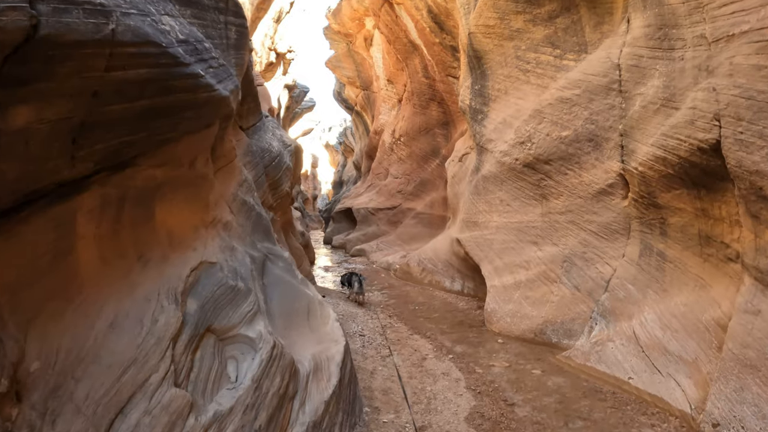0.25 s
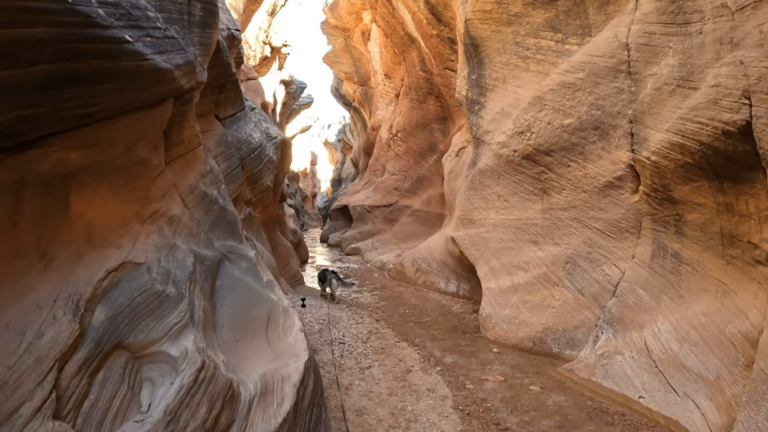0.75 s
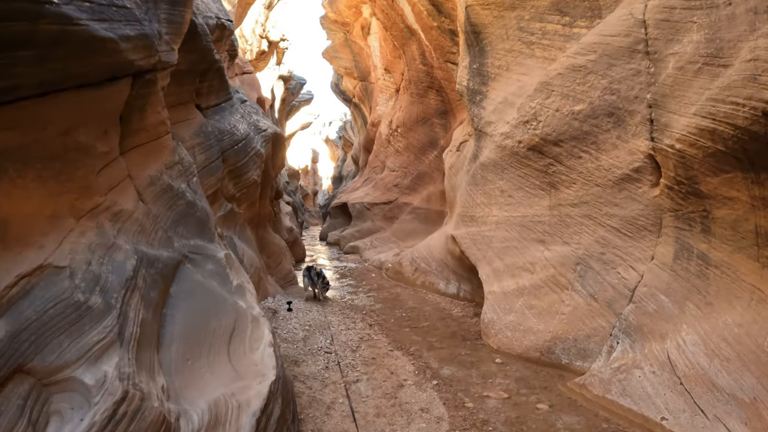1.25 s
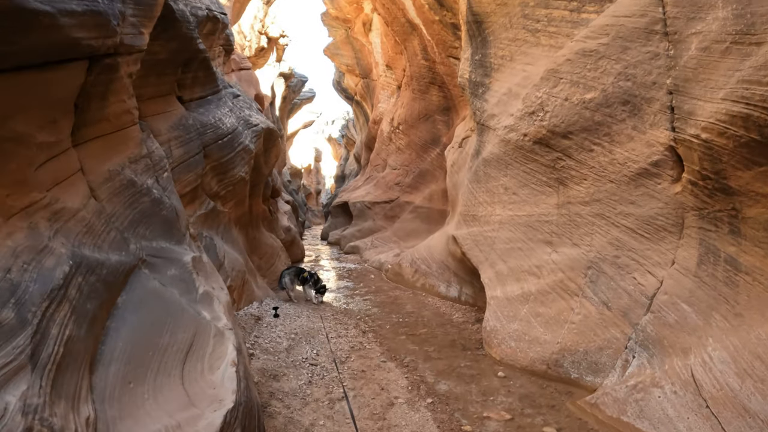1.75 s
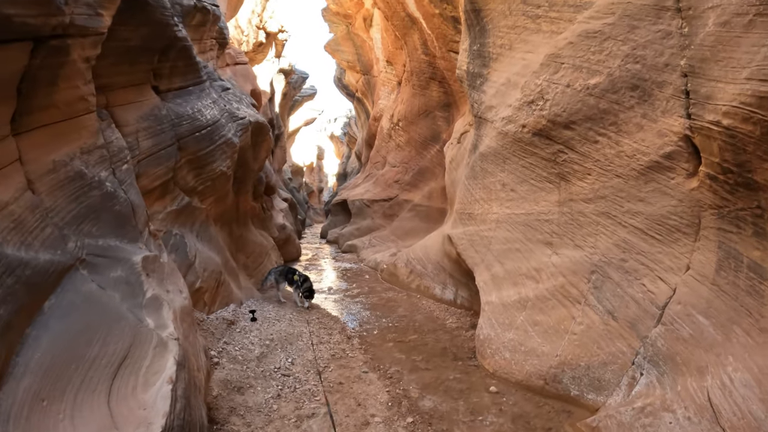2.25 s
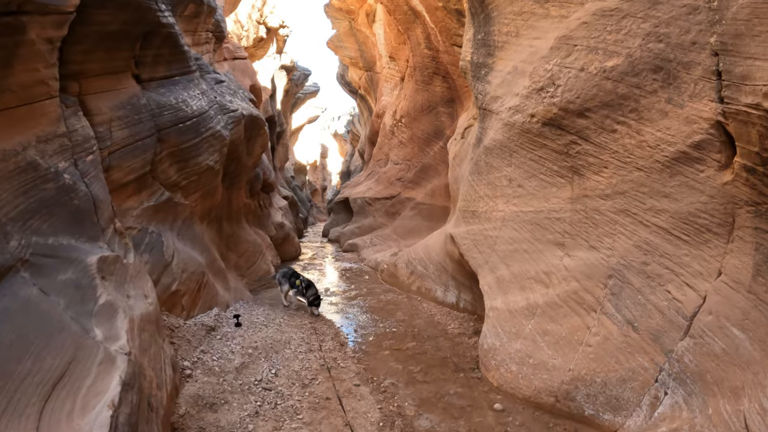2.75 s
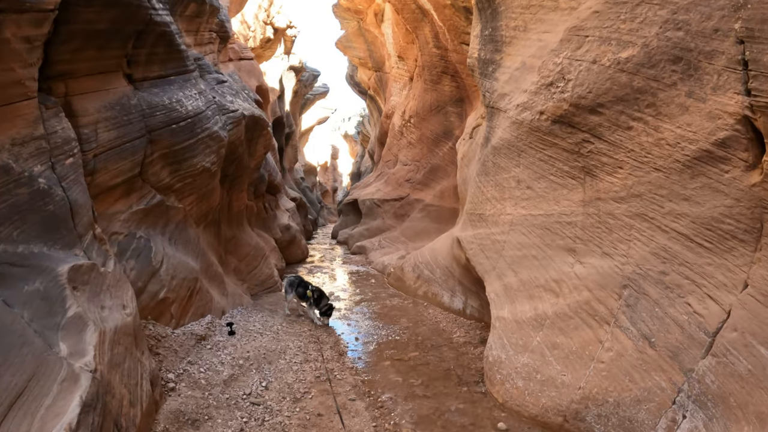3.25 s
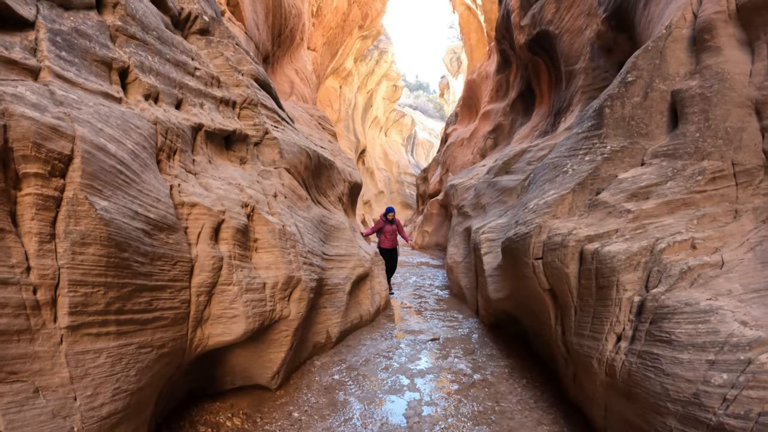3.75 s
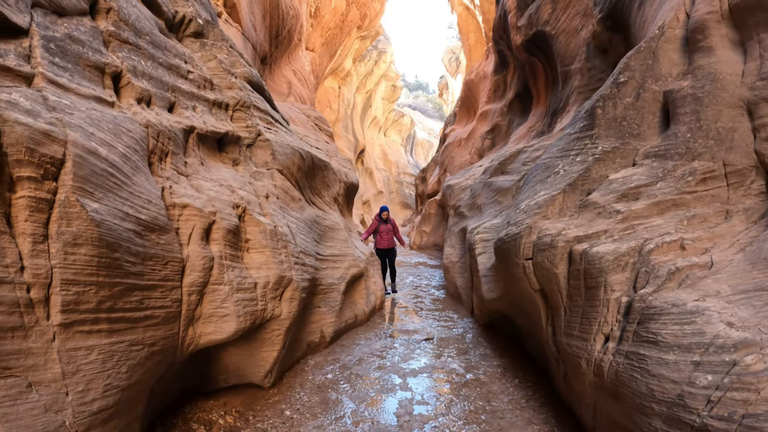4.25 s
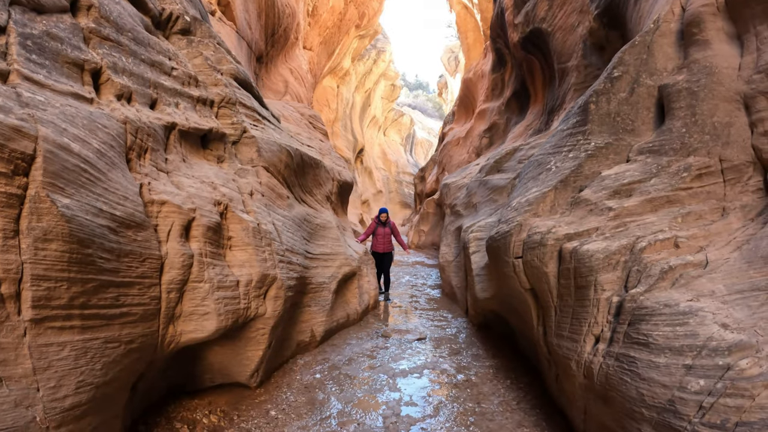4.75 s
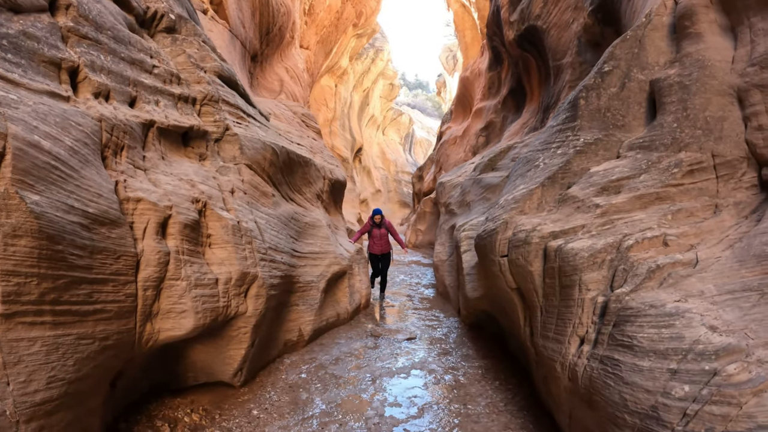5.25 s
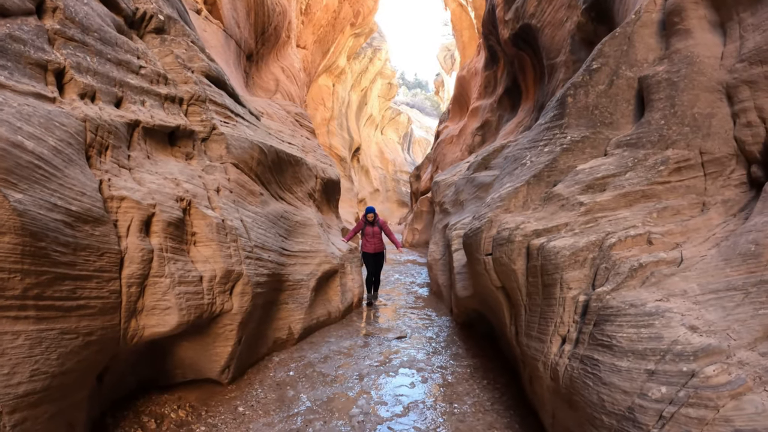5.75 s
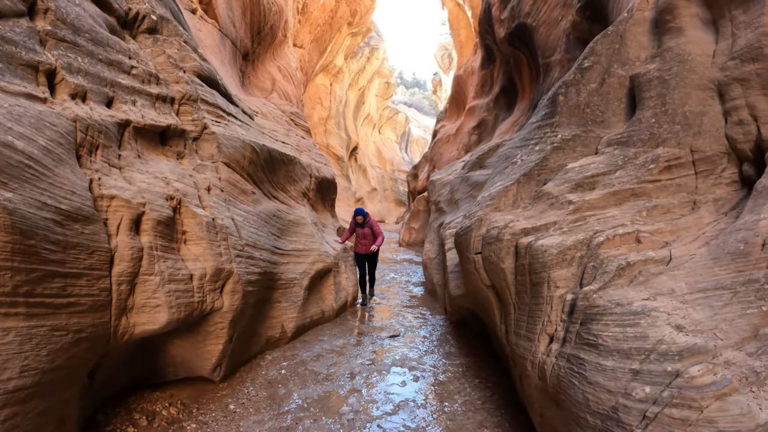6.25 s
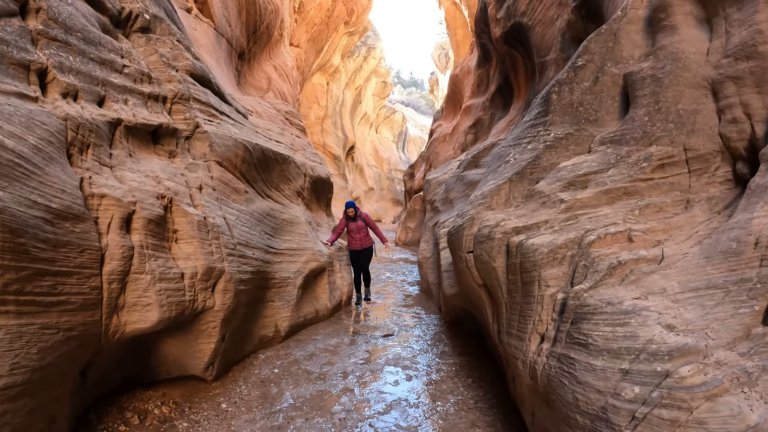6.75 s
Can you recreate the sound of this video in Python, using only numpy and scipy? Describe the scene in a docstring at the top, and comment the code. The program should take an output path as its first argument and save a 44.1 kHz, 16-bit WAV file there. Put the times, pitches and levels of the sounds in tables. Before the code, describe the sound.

Close, slightly left, someone walks on wet sand and gravel: six dull, gritty crunches with squelches, knocking pebbles and small drips, over a faint low rumble and soft creek babble. Midway the sound cuts to a person wading straight ahead; steps slap, spray, gulp and trickle in shallow water. Stone walls return a short echo, and air lightly buffets the stereo microphone.

```python
"""Footsteps in a slot canyon. First someone walks on wet sand and pebbles close by, over a low far rumble of filtered noise;
sand is random damped grains, pebbles are short modes. Then, after a cut, a walker wades through the shallow creek:
each step slaps, churns up ringing bubbles and throws spray, among gliding gulps, trickles and low surges of noise.
The creek babbles throughout, air brushes the microphone, and the sandstone walls give a short echo by convolution."""
import sys
import numpy as np
from scipy import signal
from scipy.fft import rfft, irfft, next_fast_len
from scipy.io import wavfile

SR = 44100
rng = np.random.default_rng(int(sys.argv[2]) if len(sys.argv) > 2 else 0)


def to_wav(sig):
    """Store sig (one row per channel, or 1-D mono) as 16-bit WAV at the path in sys.argv[1].

    Samples outside -1..1 are clipped; the rate is SR.
    """
    pcm = np.clip(np.atleast_2d(sig), -1, 1) * 32767
    pcm = np.round(pcm).astype(np.int16)
    wavfile.write(sys.argv[1], SR, pcm.T)  # frames by channels


N = 308259
TIME = np.arange(N) / SR
CUT_S = 3.755  # the walk on sand ends and the wading begins
LEFT_RIGHT = np.array([[1], [-1]])  # signs that turn a side signal into left and right


def gain_of(db):
    """Logarithmic level: 20 dB is a factor of ten in amplitude."""
    return 10 ** (np.asarray(db) / 20)


def evened(x):
    """Normalisation by effective value: scales to rms 1."""
    return x / np.sqrt(np.mean(x ** 2) + 1e-20)


def read(points, hz):
    """Interpolation on a logarithmic frequency axis, level beyond the end points."""
    point_hz, value = np.transpose(points)
    return np.interp(np.log(hz + 1), np.log(point_hz + 1), value)


def curve(rows):
    """Linear interpolation in time of rows of (seconds, value)."""
    return np.interp(TIME, *np.transpose(rows))


def colour(x, points, share=1):
    """Linear filtering: multiplies the spectrum by a share of a dB curve."""
    size = next_fast_len(N + 4096)
    hz = np.fft.rfftfreq(size, 1 / SR)
    return irfft(rfft(x, size) * gain_of(share * read(points, hz)), size)[..., :N]


def lowpassed(x, edge_hz, rate=SR):
    """Second-order low-pass filtering."""
    return signal.sosfilt(signal.butter(2, edge_hz, fs=rate, output="sos"), x)


def add(mix, s, sound):
    """Superposition: mixes a sound in from time s, or from 0 if s is negative."""
    part = mix[..., max(round(s * SR), 0):][..., :sound.shape[-1]]
    part += sound[..., :part.shape[-1]]


def together(levels):
    """Incoherent addition: the powers of unrelated sounds add."""
    return np.sqrt(sum(np.square(one) for one in levels))


def envelope(age, rise_s, hold_s, fall_s):
    """Attack and release: a linear rise from age 0, a hold until hold_s, an exponential decay."""
    return np.clip(age / rise_s, 0, 1) * np.exp(-np.clip((age - hold_s) / fall_s, 0, 20))


def swell(t, rise_s, fall_s):
    """Asymmetric pulse: a smooth rise to a peak at t = 0 and an exponential decay."""
    return np.exp(-np.minimum(np.where(t < 0, (t / rise_s) ** 2, t / fall_s), 20))


def noise(points, width):
    """Mid-side stereo from independent coloured noises; width is the ratio of side to mid."""
    mid, side = colour(rng.standard_normal((2, N)), points)
    return evened(mid) + width * evened(side) * LEFT_RIGHT


def resonance(hz, width_hz):
    """Narrow-band noise: slow random amplitude and phase modulate a carrier that follows the curve hz."""
    turn = np.exp(2j * np.pi * np.cumsum(hz) / SR)
    slow = lowpassed(rng.standard_normal((2, len(hz))), width_hz)
    return evened((turn * (slow[0] + 1j * slow[1])).real)


def ring(db, hz, fall, octaves, onset):
    """Damped oscillation: a softly started tone decays with time constant fall, gliding towards octaves."""
    t = np.arange(int(7 * fall * SR)) / SR
    glide = 2 ** (octaves * (1 - np.exp(-t / fall / 2)))
    turns = np.cumsum(hz * glide) / SR
    return gain_of(db) * (1 - np.exp(-t * hz / onset)) * np.exp(-t / fall) * np.sin(2 * np.pi * turns)


def grains(per_s, low_hz, high_hz, cycles, spread_db, glide, width, size, count=N):
    """Granular synthesis: damped rings at random times, pitches, strengths and places; glide raises their pitch.

    The result lasts count samples and each ring lasts size samples.
    """
    when, pitch, strength, place, length = rng.random((int(per_s * count / SR) + 1, 5)).T
    hz = low_hz * (high_hz / low_hz) ** pitch
    turns = hz[:, None] * np.arange(size) / SR
    age = turns / (cycles * (.5 + length[:, None]))  # in decay times
    strength_db = -spread_db * np.log(1 - .96 * strength)  # many weak, few strong
    height = gain_of(strength_db) * np.sqrt(hz)
    rings = height[:, None] * np.exp(-age) * np.sin(2 * np.pi * turns * (1 + glide * age))
    at = ((when * count).astype(int)[:, None] + np.arange(size)).ravel()
    pan = width * (2 * place[:, None] - 1)
    return np.array([np.bincount(at, (rings * (1 + side * pan)).ravel(), count)[:count] for side in (1, -1)])


def clumps(per_s=14, patchy_db=1.5):
    """Random amplitude modulation: a gain that wanders about 1, with drift up to about per_s Hz."""
    drift = lowpassed(rng.standard_normal(N // 100 + 1), per_s, rate=SR / 100)
    coarse_time = TIME[::100]
    return gain_of(patchy_db * np.interp(TIME, coarse_time, evened(drift)[:len(coarse_time)]))


# The far rumble's level. Each row: time in seconds, level in dB before the overall trim.
RUMBLE_LEVEL = [(0.0, -42.5), (0.66, -52.5), (0.7, -42), (0.74, -46), (2.73, -43.5), (2.78, -40),
                (3.28, -47.5), (3.3, -53), (3.38, -44.5), (3.7, -43.5)]
# Spectrum of the rumble. Each row: frequency in Hz, level in dB.
RUMBLE_TONE = [(30, -14), (60, 0.5), (85, -3), (110, 2), (135, 0), (170, 0), (220, -0.5), (290, -11),
               (380, -11.5), (480, -31), (800, -95)]
# The rumble's boom, which mostly sinks along the passage. Each row: time in seconds, pitch in Hz.
BOOM_PITCH = [(0, 165), (.7, 172), (1.2, 158), (1.9, 140), (2.3, 116), (3.0, 106), (3.74, 109.8)]


def rumble(trim_db=-0.7, boom_db=-4):
    """Resonance: far low noise, with one broad resonance of the passage standing out of it."""
    boom = resonance(curve(BOOM_PITCH), width_hz=13.2)
    bed = noise(RUMBLE_TONE, width=.07)
    return gain_of(trim_db) * gain_of(curve(RUMBLE_LEVEL)) * evened(bed + gain_of(boom_db) * boom)


# Spectrum of the creek's wash. Each row: frequency in Hz, level in dB per Hz.
CREEK_TONE = [(120, -8.5), (200, -1.5), (450, -1.5), (850, -12), (1050, -5.5), (1450, 3), (3100, -1),
              (7000, -7.5), (12000, -30.5), (15000, -34)]


def creek(wash_db=-64.5, babble_db=-69):
    """Bubble resonance in number: a soft wash and a dense babble of small bubbles swell and ebb together."""
    babble = grains(500, 950, 2800, cycles=7, spread_db=1.3, glide=.015, width=.7, size=1024)
    wash = gain_of(wash_db) * noise(CREEK_TONE, width=0.94)
    return clumps(per_s=10.5, patchy_db=1.0) * (wash + gain_of(babble_db) * evened(babble))


# Spectrum of air on the microphone. Each row: frequency in Hz, level in dB.
AIR_TONE = [(4, -5), (9, -1), (20, -9), (32, -16), (50, -27), (90, -50), (300, -80)]
# level while walking on sand, level while wading, and the waft that follows each step on the sand
AIR_WALKING_DB, AIR_STANDING_DB, WAFT_DB, WAFT_LAG_S = -46.5, -56.5, -38.5, 0.055


def air(standing):
    """Flow noise: air brushes the microphone, most when a step swings it forward."""
    wafts = together(envelope(TIME - s - WAFT_LAG_S, rise_s=0.032, hold_s=0.089, fall_s=0.16) for s, *_ in SAND_STEPS)
    walking_flow = gain_of(AIR_WALKING_DB) + gain_of(WAFT_DB) * wafts
    flow = (1 - standing) * walking_flow + standing * gain_of(AIR_STANDING_DB)
    return flow * noise(AIR_TONE, width=.25) * gain_of([[-2], [1.5]])  # left and right dB


# Swells of water pushed aside by the legs. Each row: time of the peak in seconds, level in dB, length in seconds.
SURGES = [(4.693, -56.5, 0.063), (4.97, -52.5, 0.22), (5.21, -52, 0.16), (5.658, -56, 0.1),
          (5.98, -53.5, 0.068), (6.432, -61.5, 0.047)]
# Spectrum of the surges. Each row: frequency in Hz, level in dB.
SURGE_TONE = [(40, 11.5), (90, -37), (125, -1.5), (165, 12.5), (230, 1.5), (350, -12.5), (700, -84)]
SURGE_REST_DB, SURGE_RISE = -71.5, 0.71  # the current between swells; a swell's rise as a share of its length


def surges():
    """Displacement flow: the low wash of water shoved along by each leg, as swelling noise."""
    push = together(gain_of(db) * swell(TIME - s, SURGE_RISE * length, length) for s, db, length in SURGES)
    return np.hypot(push, gain_of(SURGE_REST_DB)) * noise(SURGE_TONE, width=0.21)


# Water running off a lifted boot. Each row: start in seconds, level in dB, length in seconds, middle pitch in Hz.
TRICKLES = [(4.022, -63, 0.2, 2160), (5.302, -58.5, 0.54, 1507), (5.314, -65, 0.057, 4630),
            (6.085, -53.5, 0.082, 1050), (6.679, -67, 0.16, 1120)]


def trickles(spread=1.197, rise_s=0.011, fall_s=0.057):
    """Bubble entrainment: a thread of water falls into the creek and rings a run of like-sized bubbles."""
    out, t = np.zeros((2, N)), np.arange(SR) / SR
    for s, db, length, hz in TRICKLES:
        run = grains(260, hz / spread, hz * spread, cycles=6.6, spread_db=2.3, glide=0.011, width=0.87, size=1024, count=SR)
        add(out, s, gain_of(db) * envelope(t, rise_s, length, fall_s) * evened(run))
    return out


# Spectrum of fine spray, shared with the sand's fizz. Each row: frequency in Hz, level in dB per Hz.
SPRAY_TONE = [(1500, 5.5), (3000, 3), (4200, 5), (6000, 1.5), (8000, -5), (15000, -28.5)]


def drips(drip_db=-63):
    """Impulsive excitation: separate drops tick into the wet ground after each step on the sand."""
    drops = colour(grains(90, 1400, 6460, cycles=7.1, spread_db=5.0, glide=0, width=1.0, size=256), SPRAY_TONE)
    after_step = together(envelope(TIME - s, rise_s=0.019, hold_s=0.1, fall_s=0.4) for s, *_ in SAND_STEPS)
    return gain_of(drip_db) * after_step * evened(drops)


# Air cavities sucked open round a leg. Each row: start in seconds, end in seconds, level in dB,
# pitch at start in Hz, pitch at end in Hz, froth as a share of power from 0 to 1.
GULPS = [(5.14, 5.225, -49.5, 199, 140, 0.7), (5.155, 5.32, -57, 480.5, 279, 0.9),
         (5.205, 5.30, -50, 115, 65.6, 0.7), (5.567, 5.718, -58, 329, 228.6, 0.84),
         (6.005, 6.052, -51, 389, 522, 0.5), (6.048, 6.079, -48, 660, 1193, 0.3),
         (6.525, 6.597, -54, 431, 780, 0.4), (6.605, 6.662, -46.5, 521, 910, 0.27)]


def gulps(froth_width=.36, taper=0.6):
    """Cavity resonance: part tone and part froth, its pitch climbs as it fills and falls as it opens."""
    out = np.zeros(N)
    for start, end, db, first_hz, last_hz, froth in GULPS:
        hz = np.geomspace(first_hz, last_hz, round((end - start) * SR))
        tone = evened(np.sin(2 * np.pi * np.cumsum(hz) / SR))
        foam = resonance(hz, froth_width * froth * hz.mean())
        gurgle = np.sqrt(1 - froth) * tone + np.sqrt(froth) * foam
        add(out, start, gain_of(db) * evened(gurgle) * signal.windows.tukey(len(hz), taper))
    return out


# Single plops. Each row: start in seconds, level in dB before the soft onset, starting pitch in Hz,
# decay time constant in seconds, pitch change approached in octaves.
PLOPS = [(1.89, -29.5, 1450, 0.0024, -0.33), (1.946, -23, 1665, 0.0031, -0.83),
         (1.9496, -20, 1384, 0.0031, -0.22), (2.053, -38, 1340, 0.005, -0.02),
         (2.777, -28, 540, 0.0033, -.3), (2.812, -30, 360, 0.004, .1), (2.823, -25.5, 640, 0.0028, .15),
         (2.83, -33, 1180, 0.0027, 0), (2.844, -26.5, 570, .007, -0.052),
         (2.901, -29, 1680, 0.0038, -0.073), (3.173, -41, 2330, 0.0019, 0.079),
         (3.175, -37.5, 3020, 0.0038, 0.099), (3.687, -32, 1290, 0.0039, 0.063),
         (4.05, -46, 2310, 0.0065, 0.16), (4.135, -53, 2080, .005, 0.07), (4.257, -47, 2400, 0.0054, 0.14),
         (4.405, -54, 3100, .005, .05), (4.933, -31, 2600, 0.0038, 0.49),
         (4.966, -41, 1640, 0.0043, -0.034), (4.995, -37, 1075, 0.006, -0.16),
         (5.139, -34, 572, 0.0086, -0.61), (5.301, -42.5, 1575, 0.0058, -0.074),
         (5.328, -34, 1534, 0.0052, -0.15), (5.393, -43, 1520, 0.0065, .1),
         (5.622, -41, 476, 0.0042, 0.046), (5.651, -38, 1660, 0.0048, 0.035),
         (5.748, -47, 1120, 0.0054, -0.018), (5.919, -42.5, 1060, 0.0047, .1),
         (6.038, -39, 600, 0.0059, 0.031), (6.067, -32, 1030, 0.011, 0.017),
         (6.516, -47, 747, 0.0078, 0.031), (6.544, -47, 1010, .005, 0.022), (6.572, -43, 1440, .005, .05),
         (6.577, -34.5, 600, 0.0062, 0.41), (6.596, -39, 650, 0.0068, 0.38), (6.612, -36, 454, 0.014, 0.33),
         (6.653, -35, 1070, 0.005, 0.22), (6.668, -33, 1040, 0.012, 0.07),
         (6.671, -32.5, 1465, .005, 0.048), (6.722, -40, 1230, 0.0056, .1),
         (6.728, -41.5, 308, 0.011, 0.06), (6.791, -39, 2160, 0.0056, 0.091),
         (6.794, -43, 1000, .007, 0.061), (6.811, -40, 1083, .006, .1), (6.812, -43, 1650, .004, .1),
         (6.843, -36, 1157, 0.0077, 0.12)]


def plops():
    """Bubble resonance: single air pockets close and ring, gliding in pitch as they die."""
    out = np.zeros(N)
    for s, db, hz, fall, octaves in PLOPS:
        add(out, s, ring(db, hz, fall, octaves, onset=0.93))
    return out


# Heavy footfalls. Each row: start in seconds, level in dB before the soft onset, pitch in Hz, decay time constant in seconds.
THUDS = [(0.697, -23.5, 69, 0.0082), (2.15, -33, 215, 0.017), (2.813, -29, 227, 0.014),
         (5.145, -39, 100, 0.013)]


def thuds():
    """Damped oscillation: heavy footfalls thump the bed at a steady low pitch."""
    out = np.zeros(N)
    for s, db, hz, fall in THUDS:
        add(out, s, ring(db, hz, fall, octaves=0, onset=0.2))
    return out


# Pebbles and coarse grit knocking together. Each row: start in seconds, peak level in dB before dulling, pitch in Hz.
PEBBLES = [(0.1121, -24, 3370), (0.1143, -26.5, 4600), (0.1486, -26, 1700), (.174, -41, 2620),
           (0.2223, -16, 2090), (.2238, -17, 1520), (.236, -20.5, 1410), (0.255, -26, 1450),
           (.2603, -47, 4860), (0.5, -39, 1500), (.504, -30.5, 1350), (2.112, -23, 3700),
           (2.1218, -25, 4540), (2.156, -13, 4300), (2.1575, -18.5, 1700), (2.247, -31, 2400),
           (2.3225, -29.5, 1300), (2.332, -40, 1470), (2.7985, -27, 2100), (2.8134, -24, 1150),
           (2.866, -23, 1700), (2.8699, -15, 6850), (2.8733, -17, 5070), (2.889, -21, 3930),
           (2.901, -27.5, 1690), (2.921, -25.5, 2590), (3.3613, -30, 5000), (3.3694, -28.5, 4480),
           (3.434, -37, 2000), (3.5195, -32.5, 1860), (3.5233, -30.5, 6750), (3.529, -23.5, 5530),
           (3.534, -38, 4500), (3.545, -30.5, 4600), (3.685, -39, 2900), (3.686, -30, 1160),
           (4.7498, -22, 3000), (4.8088, -22, 5000), (4.8155, -19, 3700), (4.9302, -34, 2670),
           (5.117, -30, 2220), (6.629, -31.5, 2470)]


def pebbles(dull_hz=7000, cycles=.9):
    """Modal synthesis: stones knock in a few broad modes, cushioned and damped at once by wet sand."""
    modes = [(.62, 0.042), (1, 0.21), (1.45, -0.1), (2.3, -0.1)]  # ratio to the pitch, amplitude
    out, t = np.zeros(N), np.arange(SR // 60) / SR
    for s, db, hz in PEBBLES:
        knock = sum(share * np.sin(2 * np.pi * hz * ratio * t) * np.exp(-t * hz * ratio / cycles) for ratio, share in modes)
        knock = knock * (1 - np.exp(-t * hz))  # soft contact
        add(out, s, gain_of(db) * knock / abs(knock).max())
    return lowpassed(out, dull_hz)


# Slaps, squelches and scuffs. Each row: time of the peak in seconds, level in dB, rise in seconds, fall in seconds,
# lowest and highest ring pitch in Hz. A burst that would begin before 0 begins at 0, so its peak is later.
SPLATS = [(.015, -58, 0.22, 0.0099, 980, 7650), (0.093, -58, 0.011, 0.039, 1500, 6500),
          (0.112, -34.5, 0.0021, 0.0038, 496, 5000), (.148, -35, 0.0024, 0.0036, 734, 3520),
          (.201, -34, 0.0054, 0.0043, 800, 1700), (0.519, -51, 0.0022, 0.0041, 1800, 6400),
          (0.7, -43.5, 0.002, 0.0051, 246, 1850), (.764, -54.5, 0.02, 0.017, 2920, 8800),
          (1.0, -55.5, 0.036, 0.047, 1520, 6030), (1.137, -51.5, 0.0055, 0.0082, 1500, 7600),
          (1.327, -46.5, 0.018, 0.052, 466, 5130), (1.474, -45, 0.023, 0.016, 1030, 2200),
          (1.716, -56, 0.038, 0.024, 2000, 6960), (1.828, -44, 0.0011, 0.0014, 1500, 6900),
          (1.891, -60, .001, 0.0035, 1500, 7040), (1.944, -46, 0.00086, 0.0033, 1900, 7060),
          (1.948, -36, 0.00067, 0.0069, 380, 2130), (2.042, -50, 0.002, 0.0047, 2020, 7000),
          (2.113, -41.5, 0.018, 0.031, 806, 7300), (2.158, -26, 0.01, 0.014, 710, 7860),
          (2.268, -46, .012, 0.026, 1180, 6600), (2.514, -48.5, 0.012, 0.017, 1200, 7400),
          (2.782, -43, 0.041, 0.066, 357, 4660), (2.801, -36, .004, .012, 710, 2800),
          (2.82, -32, 0.0098, 0.014, 240, 2350), (2.867, -34.5, 0.0035, 0.009, 800, 6500),
          (2.89, -35.5, 0.015, 0.024, 706, 4600), (3.09, -56.5, 0.028, 0.24, 2000, 6700),
          (3.176, -39.5, 0.0017, 0.004, 1980, 3170), (3.364, -44.5, 0.0035, 0.028, 1700, 8100),
          (3.454, -42, .008, 0.023, 825, 2730), (3.495, -45, .008, 0.004, 850, 2700),
          (3.527, -39.5, 0.0057, 0.01, 880, 6600), (3.54, -44.5, .016, 0.013, 705, 2120),
          (3.575, -38, 0.00088, 0.0016, 750, 2250), (3.686, -39.5, 0.0018, 0.0085, 506, 4020),
          (4.164, -52, .015, 0.02, 1630, 9600), (4.295, -58, 0.067, .028, 1800, 8000),
          (4.448, -55.5, 0.0091, 0.026, 1900, 4150), (4.675, -57, 0.034, .025, 1300, 1900),
          (4.682, -54, 0.013, 0.4, 1120, 9200), (4.743, -35.5, 0.0024, 0.0063, 2320, 6460),
          (4.751, -34.5, 0.0017, 0.0096, 1060, 6740), (4.812, -32, 0.0053, 0.023, 1860, 7700),
          (4.93, -37.5, 0.00047, 0.0067, 1200, 3750), (4.978, -47, 0.00066, .0033, 6600, 8440),
          (4.993, -43.5, 0.015, 0.032, 1000, 5460), (5.117, -44, 0.034, 0.018, 890, 2900),
          (5.142, -41, 0.0018, 0.007, 400, 1400), (5.465, -49, 0.0014, 0.04, 740, 3600),
          (5.503, -57, 0.031, 0.023, 3450, 7800), (5.651, -45.5, 0.0007, 0.018, 1310, 2700),
          (5.746, -46, 0.00042, 0.015, 850, 1770), (5.805, -60, 0.0037, 0.014, 3000, 9200),
          (5.928, -41.5, 0.019, 0.014, 2350, 7700), (5.982, -25.5, 0.00047, 0.0019, 3640, 7060),
          (5.987, -34, 0.01, 0.01, 1350, 7300), (5.999, -33.5, 0.006, 0.0078, 1280, 8160),
          (6.065, -40, 0.0025, 0.0054, 3000, 7200), (6.215, -46.5, 0.01, 0.021, 2010, 6240),
          (6.513, -58, 0.0054, 0.065, 704, 4000), (6.576, -45.5, 0.0021, 0.0083, 600, 1700),
          (6.672, -44, 0.0056, 0.0085, 1000, 2210), (6.68, -47.5, 0.032, 0.084, 388, 800),
          (6.83, -50.5, 0.012, 0.031, 1900, 3930)]


def splats(bleed_db=-17):
    """Granular burst: each slap, squelch or scuff, on wet sand or in water, swells and dies as many short uneven rings."""
    out, t = np.zeros((2, N)), np.arange(-SR // 15, SR // 5) / SR
    for s, db, rise, fall, low_hz, high_hz in SPLATS:
        rings = grains(4000, low_hz, high_hz, cycles=1.5, spread_db=2.4, glide=.007, width=.65, size=160, count=len(t))
        band = signal.butter(2, [.85 * low_hz, 1.15 * high_hz], "band", fs=SR)
        rings = signal.lfilter(*band, rings) + gain_of(bleed_db) * rings
        burst = swell(t, rise, fall)
        add(out, s + t[0], gain_of(db) * evened(rings * burst) * np.sqrt(np.mean(burst ** 2)))
    return out


# Steps on wet sand. Each row: start in seconds, time the sole keeps pressing in seconds,
# and levels of crunch, grit and fizz in dB before clumps and lulls.
SAND_STEPS = [(0.076, 0.16, -52.5, -47, -47.5), (0.689, 0.22, -79, -55.5, -59),
              (1.309, 0.54, -57.5, -73, -60.5), (2.085, 0.21, -47.5, -49, -51),
              (2.756, 0.14, -40.5, -40.5, -42), (3.362, 0.19, -49.5, -47.5, -60)]


def tread(lag_s, fall_s, settle_db, settle_s, rest_db, order):
    """Relaxation of one kind of grain: the sole presses and lets go, then the footprint slowly settles."""
    levels = [gain_of(rest_db) * np.ones(N)]
    for s, hold, *dbs in SAND_STEPS:
        for db, fall in [(dbs[order], fall_s), (settle_db, settle_s)]:
            levels.append(gain_of(db) * envelope(TIME - s - lag_s, 0.017, hold, fall))
    return together(levels)


# Spectrum of the sand's crunch. Each row: frequency in Hz, level in dB per Hz.
PRESS_TONE = [(130, -35), (290, -2.5), (380, -2.5), (520, -4.5), (650, -8), (800, -9.5), (1300, 10),
              (3000, -46)]
# Spectrum of the sand's grit, shared with the small bubbles. Each row: frequency in Hz, level in dB per Hz.
BUBBLE_TONE = [(450, -10), (800, -11), (1050, -1), (1500, -0.5), (2100, -4.5), (3000, -7), (5000, -22),
               (9000, -50)]


def sand():
    """Granular friction: soles press wet sand into short dull crunches, grit and a fizz of squeezed water."""
    press = grains(700, 273, 886, cycles=1.0, spread_db=3.5, glide=0, width=0.29, size=512)
    grit = grains(900, 830, 3650, cycles=2.0, spread_db=3.5, glide=0, width=1.0, size=384)
    fizz = grains(2500, 2600, 7900, cycles=0.33, spread_db=2.0, glide=0, width=0.99, size=128)
    press_level = tread(lag_s=0.00071, fall_s=0.02, settle_db=-57.5, settle_s=0.37, rest_db=-78, order=0)
    grit_level = tread(lag_s=0.0024, fall_s=0.048, settle_db=-57, settle_s=0.46, rest_db=-60.0, order=1)
    fizz_level = tread(lag_s=-0.0039, fall_s=0.066, settle_db=-84.0, settle_s=0.44, rest_db=-61.5, order=2)
    return clumps(patchy_db=2.0) * (
        press_level * evened(colour(press, PRESS_TONE))
        + grit_level * evened(colour(grit, BUBBLE_TONE))
        + fizz_level * evened(colour(fizz, SPRAY_TONE)))


def lulls(depth_db=-4, lead_s=0.097, length_s=0.04):
    """Amplitude modulation: the sand falls quiet while the next foot swings forward."""
    dips = sum(np.exp(-((TIME - s + lead_s) / length_s) ** 2) for s, *_ in SAND_STEPS)
    return gain_of(depth_db * dips)


# Strides through the creek. Each row: start in seconds, time to sink in seconds, time in motion in seconds,
# and levels of big pockets, small bubbles and spray in dB before clumps.
STRIDES = [(3.75, 0.01, 0.25, -70, -62, -61.5), (4.0, 0.1, 0.21, -95, -70, -59),
           (4.799, 0.024, 0.21, -55, -46, -52), (5.1, 0.0097, 0.022, -49.5, -55, -83),
           (5.46, 0.2, 0.19, -55, -53, -62), (5.918, 0.019, 0.18, -55.5, -49.5, -61.5),
           (6.549, 0.096, 0.32, -61, -47.5, -50.5)]


def churn(lag_s, linger, fall_s, order):
    """Decay of agitation of one kind of grain: it lasts for a share of each stride, then the water calms."""
    return together(gain_of(dbs[order]) * envelope(TIME - s - lag_s, rise, linger * hold, fall_s)
                    for s, rise, hold, *dbs in STRIDES)


# Spectrum of the big air pockets. Each row: frequency in Hz, level in dB per Hz.
POCKET_TONE = [(130, -13), (290, 1), (500, -2), (700, -1.5), (900, 0.5), (1300, -9), (3000, -39)]


def wading():
    """Bubble resonance by size: legs churn the creek, big air pockets gulp, small bubbles ring, spray patters back."""
    pockets = grains(300, 266.6, 1038, cycles=6.4, spread_db=3.5, glide=0.046, width=0.26, size=1536)
    bubbles = grains(1300, 900, 3600, cycles=6.8, spread_db=2.1, glide=.014, width=.45, size=1024)
    spray = grains(6000, 2600, 15000, cycles=4, spread_db=1.5, glide=.008, width=.9, size=192)
    pocket_level = churn(lag_s=0.0035, linger=0.76, fall_s=0.12, order=0)
    bubble_level = churn(lag_s=0.00085, linger=0.72, fall_s=0.15, order=1)
    spray_level = churn(lag_s=-0.025, linger=1.0, fall_s=0.14, order=2)
    return clumps(patchy_db=0.5) * (
        pocket_level * evened(colour(pockets, POCKET_TONE))
        + bubble_level * evened(colour(bubbles, BUBBLE_TONE))
        + spray_level * evened(colour(spray, SPRAY_TONE)))


# Reverberation of the canyon. Each row: frequency in Hz, time to decay by 60 dB in seconds.
CANYON_DECAY = [(150, 0.52), (500, 0.71), (1400, 0.66), (4000, 0.36), (10000, 0.28)]


def canyon(x, early_db=-13, tail_db=-12, echoes=9):
    """Reverberation: near walls throw back a few echoes, then a diffuse tail that dies soonest in the treble."""
    taps = np.zeros((2, SR))
    at = np.arange(2000) * 20 + SR // 100 + rng.integers(0, 20, (2, 2000))  # one tap in every 20 samples
    np.put_along_axis(taps, at, rng.choice([-1., 1.], at.shape), 1)
    hz, t, z = signal.stft(taps, SR, nperseg=256)
    decay = gain_of(-60 * t / read(CANYON_DECAY, hz)[:, None])
    tail = signal.istft(z * decay, SR, nperseg=256)[1]
    tail *= gain_of(tail_db) / np.linalg.norm(tail[0])
    for side in tail:
        when = rng.integers(SR // 300, SR // 35, size=echoes)
        side[when] += gain_of(early_db) / np.sqrt(echoes) * rng.choice([-1, 1], size=echoes)
    # in the echo, long waves reach both microphones alike
    apart = signal.lfilter(*signal.butter(2, 480, "high", fs=SR), tail[1])
    response = np.array([tail[0] + apart, tail[0] - apart]) / np.sqrt(2)
    return signal.fftconvolve(x.mean(0)[None], response, axes=1)[:, :N]


# Stereo width by frequency: the lows spread widest, the rest is drawn in. Each row: frequency in Hz, side level in dB.
WIDTH = [(200, 3.5), (600, -4), (1400, -2.5), (2500, -1.5), (9000, -4)]


def spread_by_pitch(x):
    """Mid-side stereo: filters the side signal to set the width at each frequency."""
    return x.mean(0) + colour((x[0] - x[1]) / 2, WIDTH) * LEFT_RIGHT


# Balance during the walk on sand. Each row: frequency in Hz, left level over right in dB.
LEFT_LEAD = [(200, 0), (400, 2), (1000, 4.5), (2400, 3.5), (4400, 1.5), (8000, 3), (14000, 10.5)]


def scene(sand_echo_db=-1.5, wading_echo_db=2.5):
    """Superposition: the close, drier walk on sand, a little to the left, then the wading straight ahead."""
    after = np.clip((TIME - CUT_S) / .01 + .5, 0, 1)  # 0 on the sand, 1 in the creek
    ground = (1 - after) * lulls() * (sand() + drips()) + after * wading()
    steps = ground + splats() + trickles() + pebbles() + plops() + thuds() + gulps()
    echo = canyon(steps * gain_of((1 - after) * sand_echo_db + after * wading_echo_db))
    heard = spread_by_pitch(steps + echo + creek())
    near = colour(heard, LEFT_LEAD, .5 * LEFT_RIGHT) + rumble()
    return (1 - after) * near + after * (heard + surges()) + air(after)


# Treble response of the microphone. Each row: frequency in Hz, level in dB.
MICROPHONE = [(6000, -0.5), (7500, 1.5), (8400, -2), (10000, 2), (12300, 4), (13500, 0), (15700, -5)]


def record(dry):
    """Frequency response: the microphone's uneven treble, then a band limit at 15700 Hz."""
    band_limit = signal.firwin(511, 15700, window=("kaiser", 9), fs=SR)
    return signal.oaconvolve(colour(dry, MICROPHONE), band_limit[None], "same")


dry = scene()
out = record(dry)
to_wav(out)
```